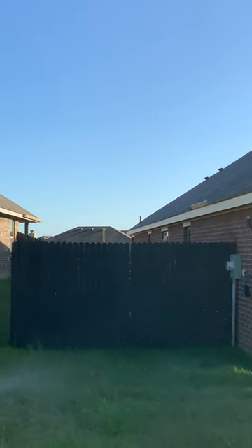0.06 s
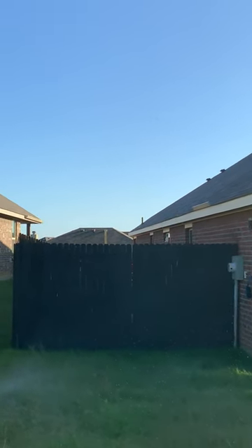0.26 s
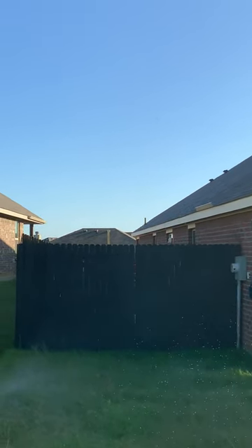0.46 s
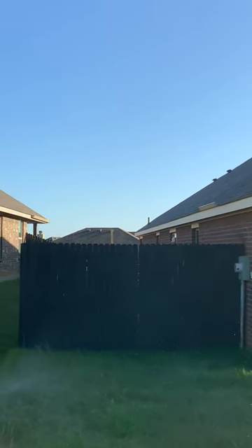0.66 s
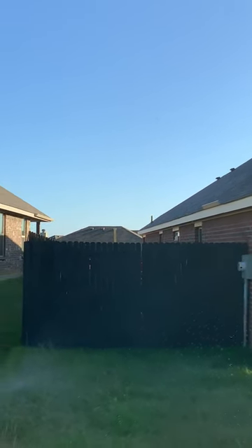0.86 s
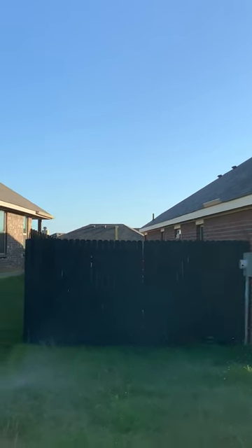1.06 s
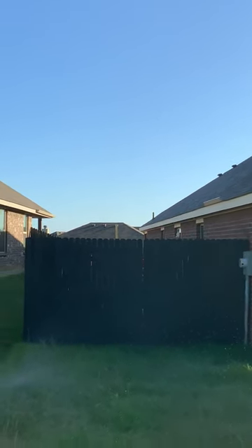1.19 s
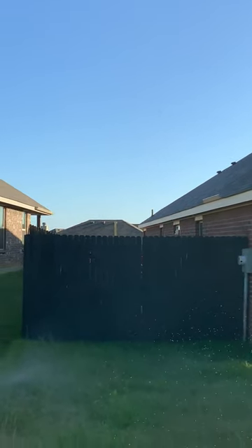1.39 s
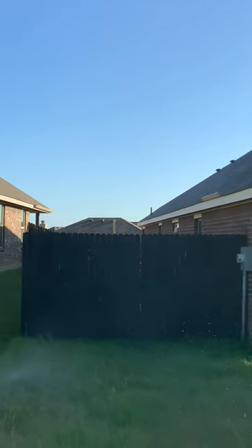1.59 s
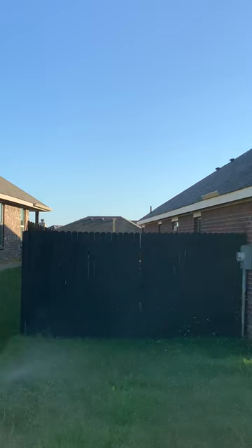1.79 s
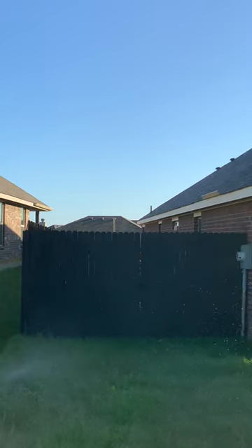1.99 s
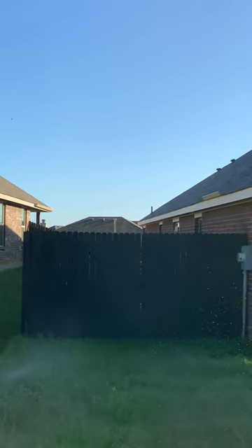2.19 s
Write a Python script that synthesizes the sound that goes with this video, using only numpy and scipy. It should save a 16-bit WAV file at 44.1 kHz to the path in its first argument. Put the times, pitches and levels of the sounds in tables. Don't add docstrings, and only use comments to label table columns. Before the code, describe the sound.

A lawn sprinkler hisses and sputters steadily in a backyard, with low wind rumble and soft thuds

```python
import sys
import numpy as np
from scipy import signal
from scipy.fft import rfft, irfft
from scipy.io import wavfile
from scipy.ndimage import uniform_filter1d

SR = 44100
rng = np.random.default_rng(int(sys.argv[2]) if len(sys.argv) > 2 else 0)


def dump_mix(stems):
    frames = np.atleast_2d(stems).T
    limited = np.clip(frames, -1, 1)
    pcm = np.round(limited * 32767).astype(np.int16)
    wavfile.write(sys.argv[1], SR, pcm)


def gain_from_decibels(decibels):
    exponent = np.asarray(decibels, float) / 20
    return 10 ** exponent


N = 99225
T = np.arange(N) / SR
F = np.arange(N // 2 + 1) * SR / N

# [f/Hz, level/dB per Hz]
SPRAY_TONE = [(150, -27), (500, 0.5), (1100, -5.5), (2000, -10), (4500, -5.5), (7000, -8.5), (11800, -12.5),
              (16500, -13.5)]
# [f/Hz, width/Hz, lift/dB]
PORT_RESONANCES = [(5354, 167, 6.5), (7950, 167, 6.5), (10620, 1000, 4), (13000, 1230, 12),
                   (15760, 3000, 18)]
# [t/s, level/dB over the hiss]
NOZZLE_SPITS = [(.364, 9), (.465, 4), (.543, 5), (.588, 9), (.613, 7), (.649, 8), (.697, 10), (.837, 6),
                (.917, 8), (.98, 6), (1.067, 6), (1.17, 6), (1.23, 5), (1.292, 6), (1.398, 6), (1.544, 6),
                (1.76, 5), (1.894, 7), (2.006, 6), (2.137, 6)]
# [f/Hz, phase between ports/half turns]
PORT_DETOUR = [(0, 0), (550, 1), (1850, 3), (2850, 4), (5750, 8), (7600, 10), (14640, 17), (15600, 18)]
# [f/Hz, share/0-1]
LEFT_SHARE = [(300, 0.15), (1000, 0.75), (2000, 0), (4000, 0.3), (5200, 0.75), (7800, 0.1), (10000, 0.95),
              (13000, 1)]
# [f/Hz, level/dB re direct spray]
WALL_SCATTER = [(1000, -0.5), (1900, -7), (3600, -2.5), (5000, -2.5), (6600, -14.5), (8700, -9.5),
                (11000, -6.5), (14600, -13)]
# [t/s, level/dB]
BREEZE_STRENGTH = [(0.0, -41), (0.22, -43), (0.34, -38.5), (1.08, -41), (1.24, -36), (1.47, -37.5),
                   (1.69, -40), (2.25, -44)]
# [f/Hz, level/dB per Hz]
EDDY_TONE = [(15, -31.5), (35, -4.5), (70, -7), (130, -13.5), (250, -21.5), (400, -29), (700, -36),
             (2000, -83)]
# [t/s, peak level/dB, f/Hz, length/cycles]
THUDS = [(0.223, -30.5, 45.6, 1.13), (0.329, -35, 66.3, 0.33), (0.448, -28.5, 68.7, 0.56),
         (.51, -30.5, 59.4, 1), (0.624, -32, 97, 1.9), (0.682, -24.5, 196, 0.64), (.848, -29.5, 300, 1.04),
         (0.893, -30, 101, 1.1), (0.917, -20.5, 194, 1.8), (0.922, -19.5, 127.4, 3.4),
         (0.927, -44, 257, 0.58), (0.929, -19.5, 60.4, 1.46), (0.956, -25.5, 37, 2.4), (.97, -16, 89, 0.69),
         (1.079, -30.5, 87, 1.2), (1.187, -19.5, 251, 1.65), (1.189, -20.5, 100, 0.41),
         (1.25, -21, 109, 0.23), (1.263, -27.5, 114, 1.2), (1.395, -30.5, 85, 2.7), (1.431, -33, 148, 1.1),
         (1.534, -17.5, 193, 0.78), (1.55, -33, 63.4, 3), (1.619, -21.5, 116, 1.15),
         (1.67, -32, 65.4, 0.65), (1.763, -33.5, 60, 0.91), (1.903, -25, 45.4, 0.83),
         (1.979, -28.5, 45.4, 2.2), (2.099, -31.5, 86, 1.1), (2.179, -35.5, 45, 1.6)]
# [t/s, length/s, start f/Hz, end f/Hz, level/dB]
BIRD_PEEPS = [
    (0.41, 0.051, 2380, 1920, -58.5),
    (.575, .03, 2280, 1950, -58.5),
    (1.108, 0.042, 1420, 1410, -56.5),
    (1.775, 0.045, 1420, 1320, -54.5),
    (1.847, 0.029, 1180, 1250, -53),
    (2.034, 0.028, 1270, 1210, -56),
    (2.007, 0.13, 1980, 2024, -60.5),
    (2.142, 0.049, 1995, 1995, -63),
]

SPRAY_DB, DROPS_DB, DROPS_PER_S = -43.5, -4.5, 5000
SPUTTER_DB, SWAY_DB, BAND_FLICKER_DB = 1.74, 0.65, 2
SPRAY_BAND_OCT, SPIT_DECAY_S = 0.42, 0.005
SHADOW_DB, PHASE_DWELL = -0.3, 0.17
EDDY_FLICKER_DB, EDDY_UNLIKE = 3.0, 0.53
PORT_LAG_S = 0.00084
THUD_SAG, THUD_UNLIKE, THUD_POINT = 0.33, 0.3, 1.58
SKIRT_DB, SKIRT_HZ, SKIRT_S = -20.5, 389, 0.007
PHONE_TOP_HZ = 15760


def rms1(x):
    return x / np.sqrt(np.mean(x ** 2))


def colour(points):
    hz, db = np.array(points).T
    return gain_from_decibels(np.interp(np.log(F + 1), np.log(hz), db))


def walk(rate):
    hold = int(SR / rate)
    steps = np.repeat(rng.standard_normal(N // 200), hold)
    w = uniform_filter1d(uniform_filter1d(steps, hold), hold)[:N]
    return rms1(w - w.mean())


def flutter(rate):
    w = walk(rate)
    return rms1(w - uniform_filter1d(w, int(3.5 * SR / rate)))


def spray(pulse):
    chance, size = rng.random((2, N))
    hits = chance < DROPS_PER_S / SR
    drops = hits * gain_from_decibels(-2.0 * np.log(size + 1e-4)) * rng.standard_normal(N)
    water = rng.standard_normal(N) + gain_from_decibels(DROPS_DB) * rms1(drops)
    out = rfft(water) / (1 + (F / 400) ** 4)
    for hz, lively in [(700, 0.16), (1400, 0.59), (2800, 0.5), (5600, 0.78), (9000, 0.91), (14000, 0.6)]:
        band = np.exp(-0.5 * (np.log2((F + 1) / hz) / SPRAY_BAND_OCT) ** 2)
        motion = (pulse * gain_from_decibels(BAND_FLICKER_DB * flutter(110))) ** lively
        out = out + band * rfft(rms1(water * motion))
    lift = sum(db / (1 + (2 * (F - hz) / width) ** 4) for hz, width, db in PORT_RESONANCES)
    return out * colour(SPRAY_TONE) * gain_from_decibels(lift)


def sprinkler():
    spits = 0
    for t0, db in NOZZLE_SPITS:
        spits = spits + (gain_from_decibels(db) - 1) * (T > t0) * np.exp(-np.abs(T - t0) / SPIT_DECAY_S)
    pulse = gain_from_decibels(SPUTTER_DB * flutter(130) + SWAY_DB * walk(20.3)) * (1 + spits)

    half_turns = np.interp(F, *np.array(PORT_DETOUR).T)
    dwell = PHASE_DWELL * np.sin(2 * np.pi * half_turns) / (2 * np.pi)
    detour = np.exp(0.5j * np.pi * (half_turns - dwell)) * gain_from_decibels(SHADOW_DB / 2)

    hz, share = np.array(LEFT_SHARE).T
    share = np.clip(np.interp(np.log(F + 1), np.log(hz), share), 0, 1)
    from_left = np.sqrt(share) * spray(pulse)
    from_right = np.sqrt(1 - share) * spray(pulse)
    direct = np.array([from_left * detour + from_right / detour,
                       from_left / detour + from_right * detour])
    walls = colour(WALL_SCATTER) * np.array([spray(pulse ** 0.5), spray(pulse ** 0.5)])
    return gain_from_decibels(SPRAY_DB) * rms1(irfft(direct + walls, N))


def breeze():
    out, swell = 0, flutter(29.94)
    for hz in 30 * 2.0 ** np.arange(5):
        band = colour(EDDY_TONE) * np.exp(-0.5 * (np.log2((F + 1) / hz) / 0.46) ** 2)
        same, left, right = (irfft(band * rfft(rng.standard_normal(N)), N) for _ in range(3))
        late = np.roll(same, int(PORT_LAG_S * SR))
        depth_db = EDDY_FLICKER_DB * (hz / 120) ** 0.1
        flicker = gain_from_decibels(depth_db * (0.75 * swell + 0.54 * flutter(25.16)))
        out = out + flicker * np.array([same + EDDY_UNLIKE * left, late + EDDY_UNLIKE * right])
    return rms1(out) * gain_from_decibels(np.interp(T, *np.array(BREEZE_STRENGTH).T))


def thuds():
    out, skirt = np.zeros((2, N)), np.zeros(N)
    for t0, db, hz, cycles in THUDS:
        skirt += gain_from_decibels(db + SKIRT_DB) * np.exp(-0.5 * ((T - t0) / SKIRT_S) ** 2)
        detune, phase = THUD_UNLIKE * rng.standard_normal((2, 2))
        for ch in range(2):
            lag = (ch - 0.5) * PORT_LAG_S
            x = (T - t0 - lag) * hz * (1 + detune[ch] / 10)
            bell = np.exp(-0.5 * np.abs(2.07 * x / cycles) ** THUD_POINT)
            sinking = x - THUD_SAG * x * x / 2 / cycles
            out[ch] -= gain_from_decibels(db) * bell * np.sin(2 * np.pi * sinking + phase[ch])
    rag = irfft(rfft(rng.standard_normal((3, N))) * F / (1 + (F / SKIRT_HZ) ** 6), N)
    shared = np.array([rag[0], np.roll(rag[0], int(PORT_LAG_S * SR))])
    return out + skirt * rms1(shared + 0.5 * rag[1:])


def birds():
    out = np.zeros(N)
    for t0, length, hz0, hz1, db in BIRD_PEEPS:
        x = np.clip((T - t0) / length, 0, 1)
        glide = np.cumsum(hz0 + (hz1 - hz0) * x) / SR
        out += gain_from_decibels(db) * np.sin(np.pi * x) * np.sin(2 * np.pi * glide)
    return np.array([out, np.roll(out, 4) * 0.98])


def scene():
    return sprinkler() + breeze() + thuds() + birds()


def top_cut(x):
    return signal.sosfilt(signal.butter(12, 16080, fs=SR, output="sos"), x)


def record(dry):
    mix = irfft(rfft(dry) / (1 + (F / PHONE_TOP_HZ) ** 400), N)
    return top_cut(mix)


dry = scene()
out = record(dry)
dump_mix(out)
```